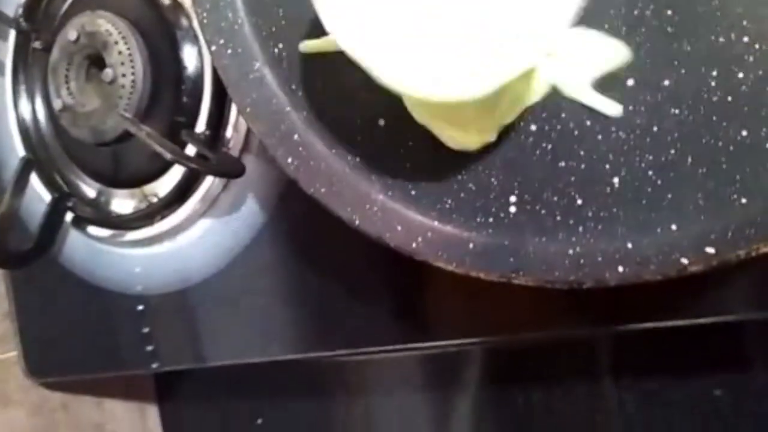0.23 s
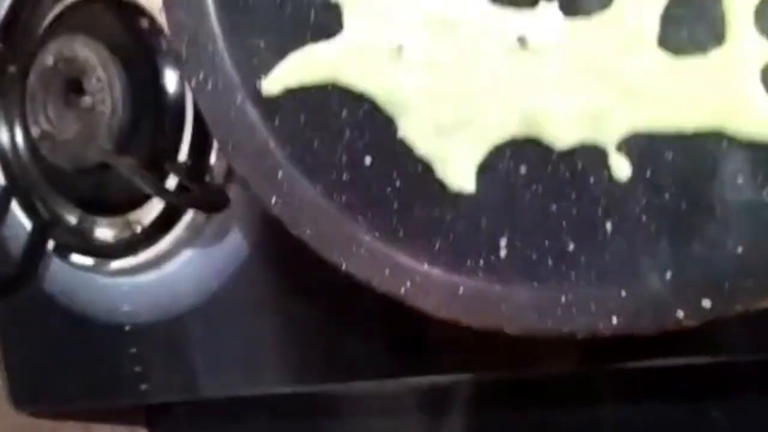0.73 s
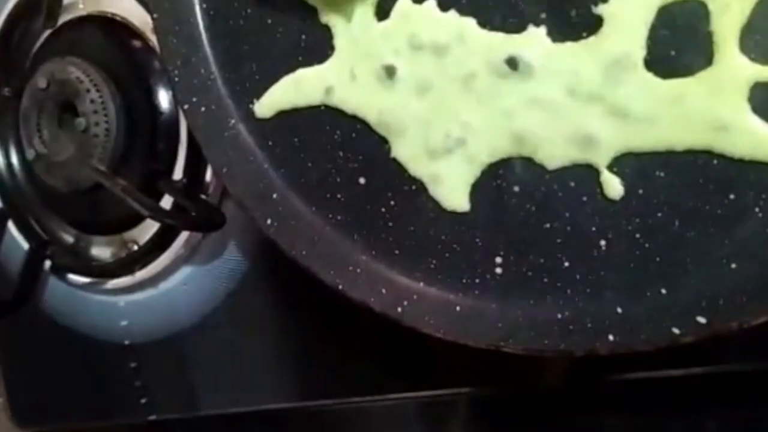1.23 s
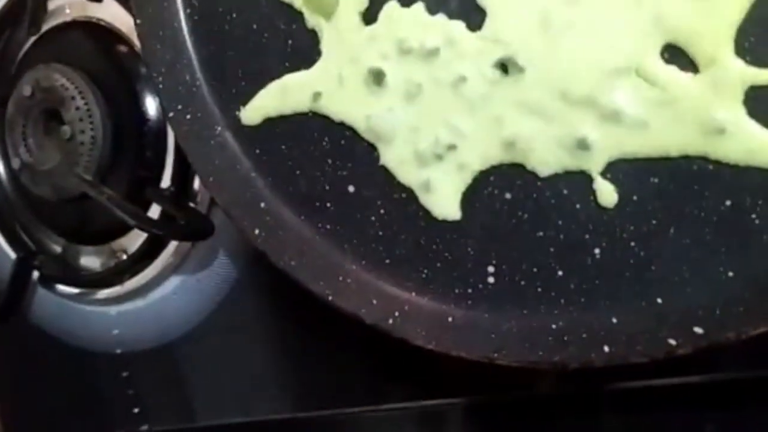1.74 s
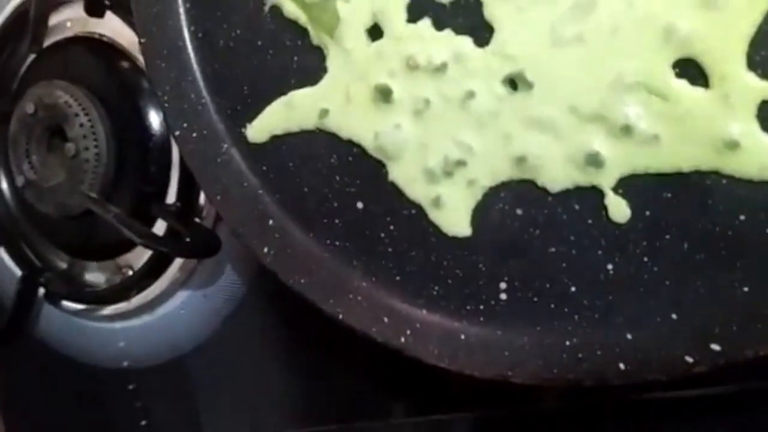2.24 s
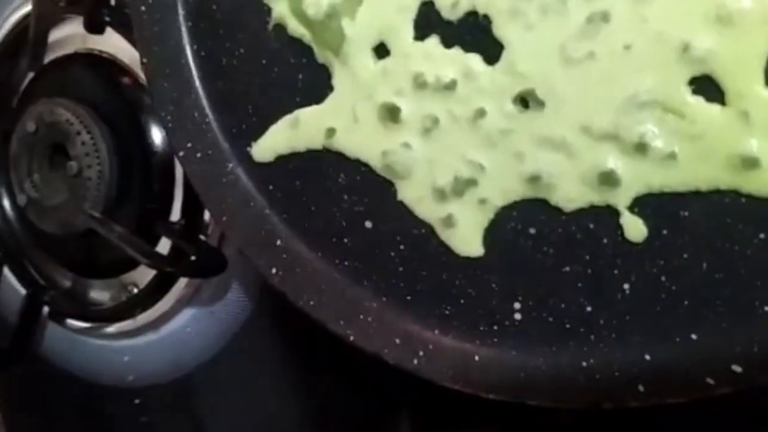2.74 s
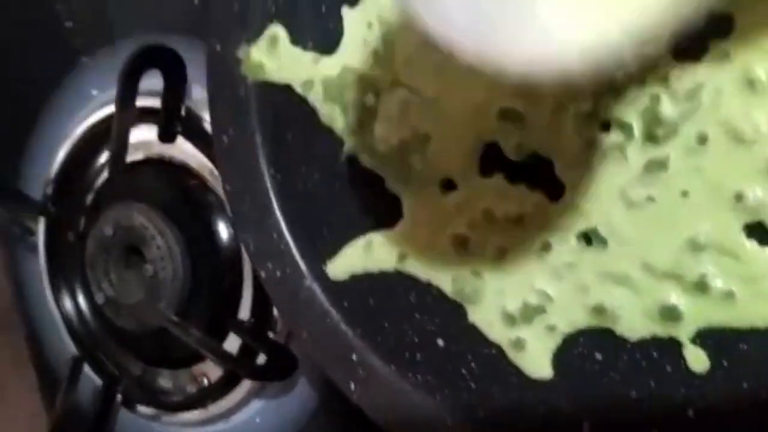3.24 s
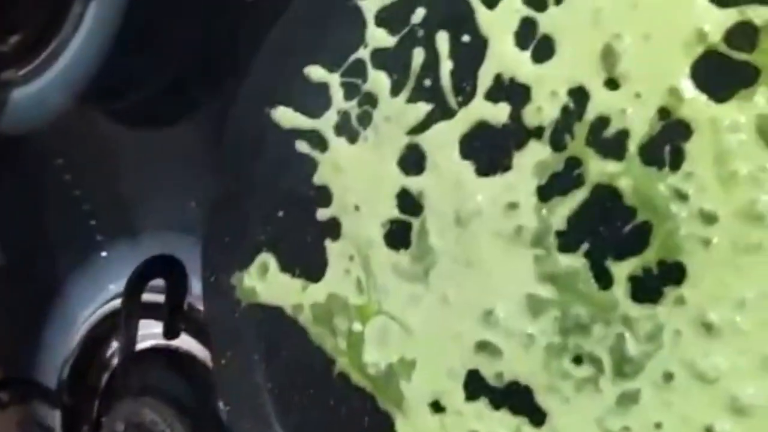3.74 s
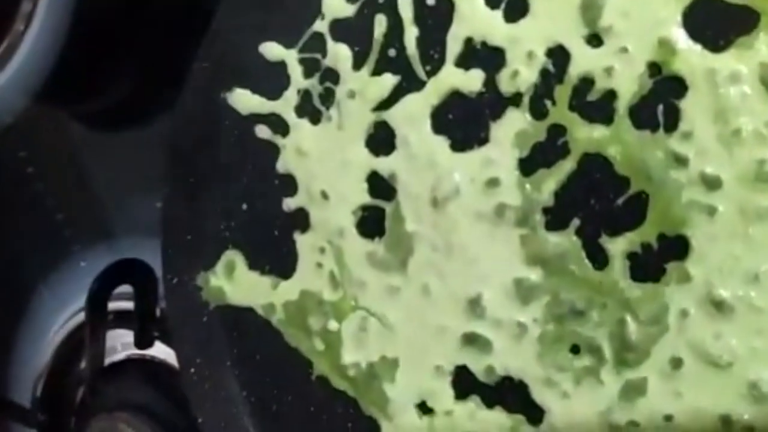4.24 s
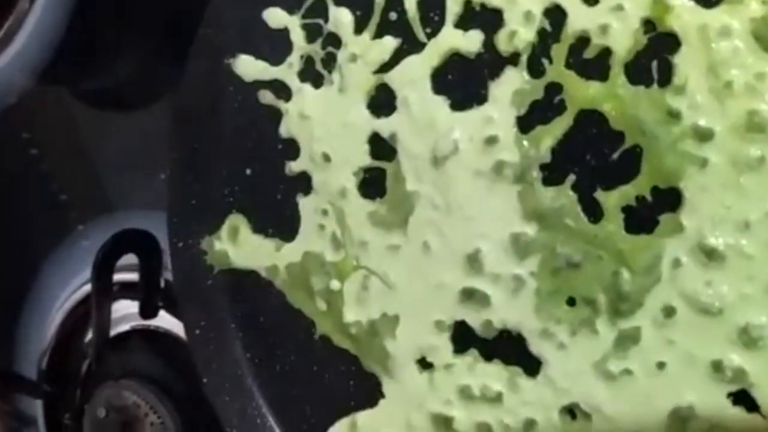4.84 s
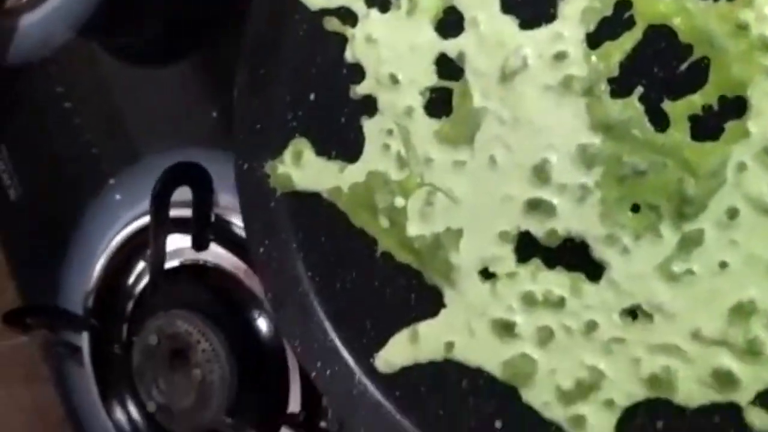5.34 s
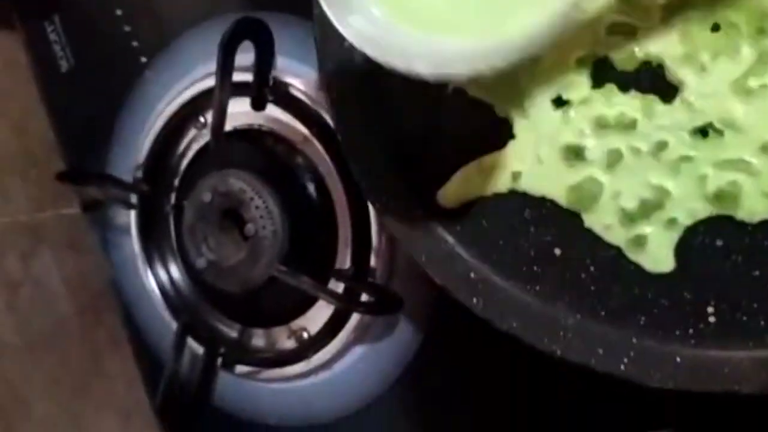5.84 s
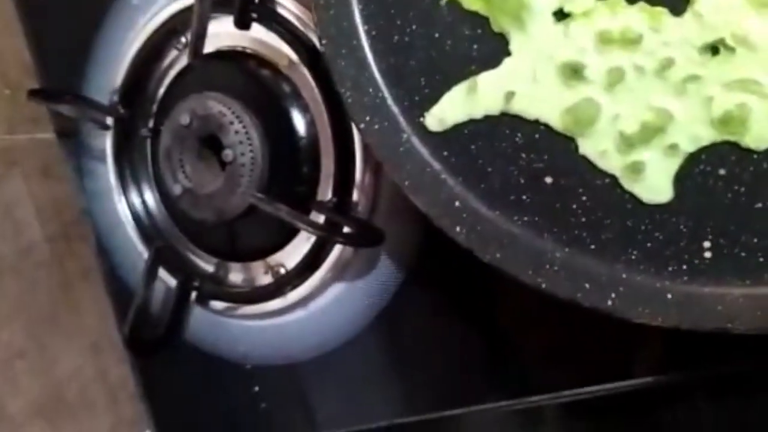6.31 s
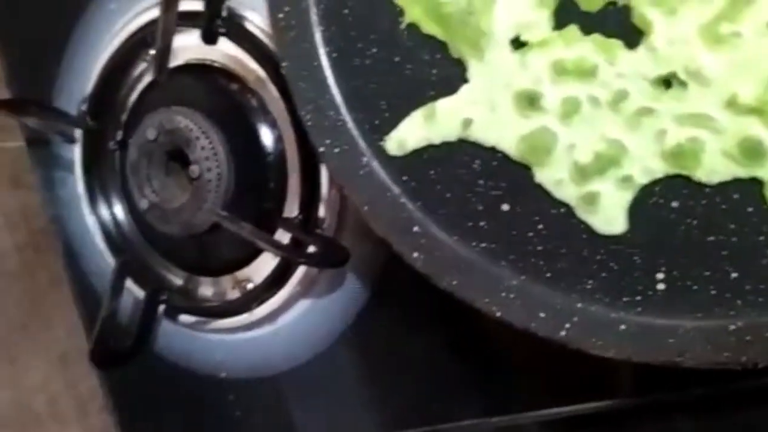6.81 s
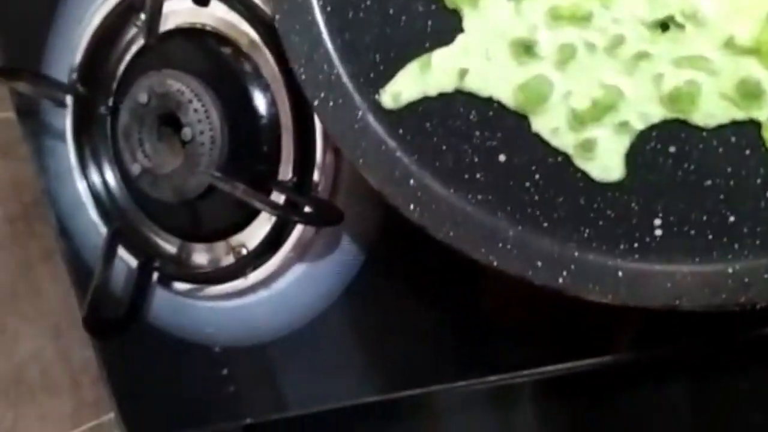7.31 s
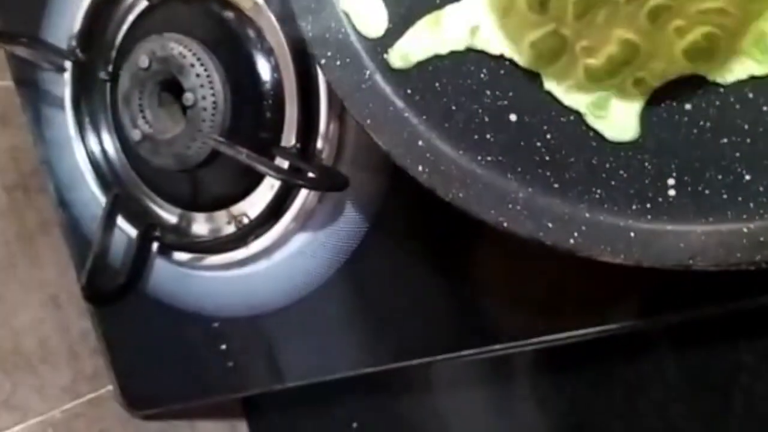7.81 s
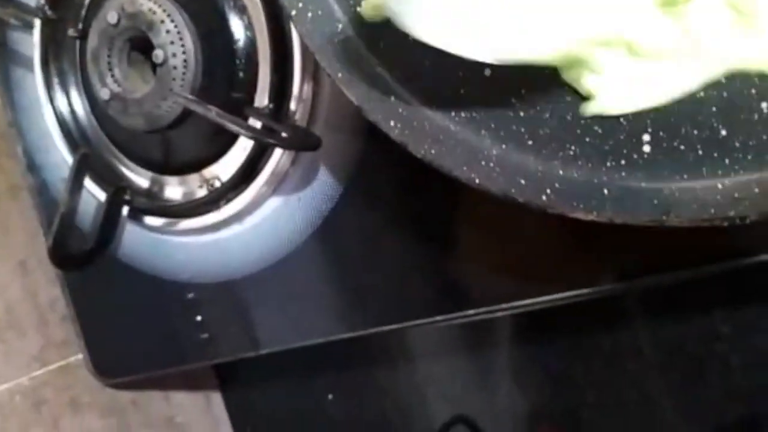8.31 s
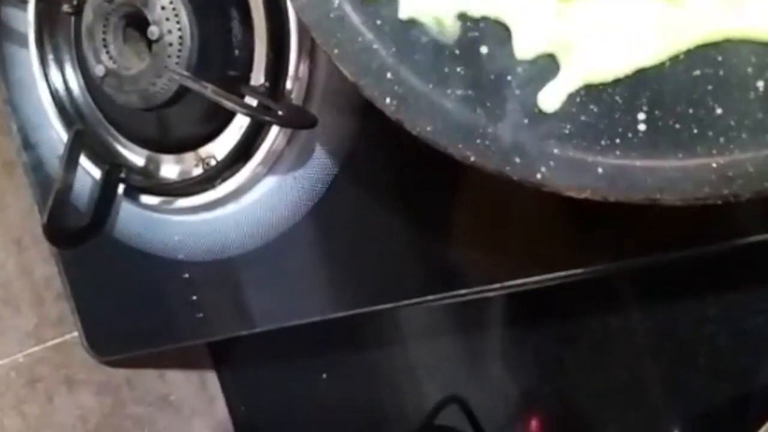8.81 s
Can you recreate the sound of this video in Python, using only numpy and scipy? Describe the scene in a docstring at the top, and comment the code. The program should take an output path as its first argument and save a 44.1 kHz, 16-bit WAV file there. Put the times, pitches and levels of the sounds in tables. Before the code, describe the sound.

Oily frying, recorded close and fairly dry by a moving handheld microphone. Batter hits hot metal in repeated sizzling gushes, strongest in the first third, then calms to a thin crackle. Padded knocks, a brief dull scuff and tiny high squeaks come midway, followed by a cluster of sharp spitting drops. Later gentler sizzles rise and fade over a low throbbing hum with a thin whine.

```python
"""In a small kitchen, thin batter is ladled onto a hot oiled pan, pour after pour.
Each pour surges as random steam-bubble snaps in six bands, finer ones mostly later, and settles to a crackle.
Filtered noise bursts make spitting drops, wavering sines the squeaks of trapped steam,
gated sines and noise the soft bumps and a scuff, and throbbing sines over low noise the stove."""
import sys
import numpy as np
from scipy import signal
from scipy.fft import rfft, irfft, next_fast_len
from scipy.io import wavfile

SR = 44100
rng = np.random.default_rng(int(sys.argv[2]) if len(sys.argv) > 2 else 0)


def wav_record(signal):
    """Record a signal, one row per channel, as 16-bit PCM in the file named by sys.argv[1]."""
    frames = np.transpose(np.atleast_2d(signal))
    bounded = np.clip(frames, -1, 1)
    # unit amplitude maps onto the largest positive 16-bit level
    quanta = np.round(bounded * 32767).astype(np.int16)
    wavfile.write(sys.argv[1], SR, quanta)


N = 399546
T = np.arange(N) / SR
PADDED = next_fast_len(N + SR // 10, True)
FREQS = np.maximum(np.arange(PADDED // 2 + 1) * SR / PADDED, 1)


def from_db(db):
    """Logarithmic level: 20 dB is a tenfold amplitude."""
    return 10 ** (np.asarray(db) / 20)


def rms_one(x):
    """Normalisation: scale to unit root mean square."""
    return x / np.sqrt(np.mean(x ** 2) + 1e-20)


def in_time(rows):
    """Linear interpolation: each column of a curve at every sample."""
    s, *columns = np.transpose(rows)
    return [np.interp(T, s, column) for column in columns]


def high_pass(x, order, hz):
    """High-pass filtering: remove what lies below a pitch."""
    return signal.sosfilt(signal.butter(order, hz, "high", fs=SR, output="sos"), x)


def colour(x, points):
    """Spectral shaping: levels in dB interpolated over log frequency in Hz."""
    hz, db = np.transpose(points)
    gain = from_db(np.interp(np.log(FREQS), np.log(hz), db))
    return irfft(rfft(x, PADDED) * gain, PADDED)[:N]


def resonator(hz, width_hz):
    """Damped resonance: coefficients of a pole pair with gain 1 near its top."""
    r, w = np.exp(-np.pi * width_hz / SR), 2 * np.pi * hz / SR
    return np.array([1, 0, -1]) * (1 - r * r) / 2, [1, -2 * r * np.cos(w), r * r]


def resonate(x, hz, width_hz):
    """Resonant filtering: a sound rings at one fixed pitch."""
    return signal.lfilter(*resonator(hz, width_hz), x + 1e-18)


def drift(per_s):
    """Slow random modulation: noise of rms 1, joined by straight lines between knots."""
    knots = rng.standard_normal(4000)
    return rms_one(np.interp(T * per_s, np.arange(len(knots)), knots))


def swell(start, length, edge):
    """Amplitude envelope: a rounded gate; edge is the share of its length spent rising or falling."""
    phase = (T - start) / length
    return np.sin(np.pi / 2 * np.clip(np.minimum(phase, 1 - phase) / edge, 0, 1))


def tone(hz, waver_hz, per_s=12):
    """Random frequency modulation: a wavering sine of rms 1."""
    return np.sqrt(2) * np.sin(2 * np.pi * np.cumsum(hz + waver_hz * drift(per_s)) / SR)


def add(out, s, sound):
    """Superposition: mix a short sound in at its time."""
    i = round(s * SR)
    out[i:i + len(sound)] += sound[:N - i]


def kitchen(x, wet_db, t60_s=0.17, wall_cut_hz=9000):
    """Reverberation: direct sound plus an exponentially decaying, duller tail from hob and walls."""
    t = T[:SR // 3]
    tail = rng.standard_normal(len(t)) * from_db(-60 * t / t60_s) * (t > .002)
    tail = signal.sosfilt(signal.butter(1, wall_cut_hz, fs=SR, output="sos"), tail)
    return x + from_db(wet_db) * signal.fftconvolve(x, tail / np.linalg.norm(tail))[:N]


# Stove hum. Each row: pitch in Hz, waver in Hz, level in dB before the swell, throb in dB.
HUM = [(98, 1.62, -66.5, 3.5), (145, 2.4, -59.5, 4.5)]
# Low noise colour. Each row: pitch in Hz, relative level in dB.
RUMBLE = [(20, -26), (40, -9.5), (62, -2.5), (82, -5.5), (105, 1), (150, 7), (175, -1), (215, -5),
          (255, -2), (380, -4), (550, -2), (800, -5), (1500, -7)]
# Stove as the microphone moves. Each row: time in seconds, swell of hum and rumble in dB, whine in dB.
STOVE_BALANCE = [(0, -1, -69), (2.5, -2.5, -64), (3.4, -3.5, -62), (4.1, -2.5, -58.5), (5.3, -2.5, -57.5),
                 (6.1, -3, -63.5), (6.6, -1, -57.5), (9.06, 0.5, -67)]


def stove(rumble_db=-49, whine_hz=491.5):
    """Amplitude modulation: throbbing hum over a low rumble, beside a thin whine of slowly shifting level."""
    swell_db, whine_db = in_time(STOVE_BALANCE)
    hum = 0
    for hz, waver_hz, db, throb_db in HUM:
        throb = throb_db * np.tanh(drift(9.6))
        hum = hum + from_db(db + throb) * tone(hz, waver_hz)
    rumble_colour = list(RUMBLE) + [(SR / 2, -70)]
    rumble = from_db(rumble_db) * rms_one(colour(rng.standard_normal(N), rumble_colour))
    whine = from_db(whine_db) * tone(whine_hz, waver_hz=0.63)
    return from_db(swell_db) * (hum + rumble) + whine


def scuff(start_s=4.99, length_s=0.13, level_db=-48.5, hz=476, width_hz=590):
    """Filtered friction noise: a brief dull rub of handling, noise through two equal resonances."""
    rub = resonate(resonate(rng.standard_normal(N), hz, width_hz), hz, width_hz)
    return from_db(level_db) * swell(start_s, length_s, edge=.4) * rms_one(rub)


# Soft bumps of handling. Each row: start in seconds, level in dB, mean pitch in Hz, length in seconds.
BUMPS = [(3.81, -46, 45, .048), (3.925, -53, 42, .05), (4.428, -43.5, 265, 0.024), (4.427, -49, 176, 0.028),
         (4.446, -46, 98, 0.17), (4.705, -50, 62, .06), (4.79, -51, 250, .035), (4.84, -49, 96.7, 0.15),
         (4.915, -45, 267, 0.038), (4.92, -48, 206, 0.031), (8.9, -55, 94.6, 0.042)]


def bumps(wobble=0.0405):
    """Short tone bursts: dull, padded knocks of low sines on one unsteady clock."""
    clock = np.cumsum(1 + wobble * drift(60)) / SR
    out = np.zeros(N)
    for s, db, hz, length in BUMPS:
        cycles = np.sqrt(2) * np.sin(2 * np.pi * hz * clock)
        out += from_db(db) * swell(s, length, edge=0.41) * cycles
    return out


# Thin squeaks. Each row: start in seconds, length in seconds, level in dB before the partials' own,
# extra level of the lower partials in dB.
SQUEAKS = [(4.353, .016, -38, 4), (4.378, .024, -39, 1), (4.403, .022, -45, 9), (4.427, .024, -41, -2),
           (4.46, 0.078, -44, 6), (5.489, .016, -36, -6), (5.783, .02, -43, 0), (6.26, .012, -41, -6),
           (6.283, .075, -51, -14)]
# Squeak partials, the highest last. Each row: pitch in Hz, waver in Hz, mean relative level in dB.
SQUEAK_PARTIALS = [(5560, 130, -23), (6660, 420, -10), (7700, 190, -12), (10700, 160, -12),
                   (12200, 170, -10), (12750, 380, -8), (13130, 170, -8), (14700, 110, -2)]


def squeaks(flicker_db=4.5):
    """Inharmonic partials: shaky whistles, as of steam forced out under batter; each comes and goes."""
    top, lower = np.zeros(N), np.zeros(N)
    for s, length, db, lower_db in SQUEAKS:
        gate = from_db(db) * swell(s, length, edge=0.11)
        top += gate
        lower += gate * from_db(lower_db)
    partials = []
    for hz, waver_hz, db in SQUEAK_PARTIALS:
        flicker = from_db(db + flicker_db * drift(70))
        partials.append(flicker * tone(hz, waver_hz, per_s=400))
    return kitchen(top * partials[-1] + lower * sum(partials[:-1]), wet_db=1)


def pops(per_s=110, usual_db=-29.5, spread_db=2.5, top_hz=11500):
    """Random point process: lesser drops at chance times, louder while the driest batter ticks."""
    level_db = usual_db + 2 * swell(4.64, 1.4, edge=0.16)   # dry from 4.64 s for 1.4 s, lifted by 2 dB
    rows = []
    for when, size, pitch in rng.random((int(per_s * N / SR), 3)):
        peak_db = level_db[int(when * N)] + spread_db * min(-np.log(size), 3)
        rows.append((when * T[-1], peak_db, 2500 * 4 ** pitch, top_hz, .0004))
    return rows


# Spitting drops. Each row: time in seconds, peak in dB before the bass cut, pitch in Hz,
# top of the snap in Hz, decay time of the spray in seconds.
SPITS = [(0.1911, -9, 8340, 12000, .0005), (2.4377, -4, 9800, 13000, .0003),
         (2.8619, -14, 8340, 12000, .0003), (2.8724, -16, 8600, 12000, .0003),
         (4.3443, -17, 6170, 11000, .0006), (4.5073, -19, 7200, 11000, .001),
         (4.7062, -17, 2600, 9000, 0.00059), (4.8633, -25, 5700, 10000, .0003),
         (5.1886, -26, 900, 3500, 0.002), (5.3164, -13.5, 9800, 14000, .0008),
         (5.3192, -24, 8500, 12000, .0006), (5.3518, -16.5, 9100, 13000, .0004),
         (5.4220, -14, 7000, 12000, .0012), (5.4255, -23, 4000, 9000, .002),
         (5.5440, -15, 8000, 13000, .0005), (5.5734, -18.5, 7700, 12000, .0012),
         (5.5802, -21, 5800, 10000, .0004), (5.6444, -19, 7700, 11000, .001),
         (5.8591, -17, 7640, 13000, 0.007), (5.9681, -20, 5800, 10000, .0004),
         (5.9772, -13, 7300, 12000, .0005), (5.9790, -25.5, 7500, 11000, 0.012),
         (6.0355, -19, 8400, 13000, 0.0058), (6.1149, -14, 10000, 14000, 0.0012),
         (6.1615, -15, 1600, 6500, .0005), (6.1652, -19.5, 1300, 5460, .0004),
         (6.2215, -21, 5900, 10000, .0005), (6.2747, -28, 6700, 10000, .0008),
         (6.3006, -22, 8260, 13000, .0006), (6.3108, -17, 6800, 11000, .0012),
         (6.3588, -15, 5200, 11000, .0003), (6.4682, -19, 2400, 8000, 0.00032),
         (6.6889, -17, 7800, 12000, 0.00036), (7.4375, -13, 3600, 9000, 0.0005),
         (7.9363, -3.5, 7360, 10000, 0.0003), (8.1419, -28, 5520, 12000, .0004),
         (8.2221, -25, 7620, 12000, .0003)]


def spits(spray_db=-6, full_spray_s=0.0035, tail_db=-20, tail_t60_s=.08, width_hz=3000, lowest_hz=750):
    """Impulse excitation: a drop's click, decaying noisy spray and short dry tail drive a broad resonance."""
    out, t = np.zeros(N), T[:SR // 20]
    for s, peak_db, hz, top_hz, length in list(SPITS) + pops():
        # a spray shorter than full_spray_s is also weaker
        strength = from_db(spray_db) * np.sqrt(min(length / full_spray_s, 1))
        spray = strength * np.exp(-(t / length) ** 2)
        tail = from_db(tail_db - 60 * t / tail_t60_s)
        push = (spray + tail) * rng.standard_normal(len(t))
        push[0] = 2   # the first click
        ringing = resonate(push, hz, min(width_hz + hz / 2, 2 * hz))
        snap = signal.lfilter(*signal.butter(2, top_hz, fs=SR), ringing)
        add(out, s, from_db(peak_db) * snap / abs(snap).max())
    return high_pass(out, 2, lowest_hz)


def bursts(per_s, size_db, largest, width_share, count=14):
    """Random impulses through damped resonances: bubbles snap at pitches of their own; flat on average."""
    chance = np.clip(per_s / SR, 0, 1)
    sizes = from_db(size_db * np.minimum(rng.exponential(1, N), largest)) * rng.choice([-1, 1], N)
    clicks = sizes * (rng.random(N) < chance) / np.sqrt(chance)   # mean power does not follow the rate
    dealt, snaps, power = rng.integers(0, count, N), 0, 0
    for k, hz in enumerate(np.geomspace(900, 14000, count)):
        snaps = snaps + resonate(clicks * (dealt == k), hz, width_share * hz)
        response = rfft(resonate(signal.unit_impulse(1024), hz, width_share * hz))[1:-1]
        power = power + abs(response) ** 2
    hz = np.linspace(0, SR / 2, len(power) + 2)[1:-1]
    return colour(snaps, np.c_[hz, -10 * np.log10(power)])   # undo the mean colour


def scatter(x, share=0.34, delays_s=(.0007, .0019, .0043)):
    """All-pass diffusion: pan wall, hob and backsplash smear each snap in time without colouring it."""
    spectrum = rfft(x, PADDED)
    for delay_s in delays_s:
        echo = np.exp(-2j * np.pi * FREQS * delay_s)
        spectrum = spectrum * (share - echo) / (1 - share * echo)
    return irfft(spectrum, PADDED)[:N]


# Resonances and hollows of pan and hob. Each row: pitch in Hz, width in Hz, then the lift in dB of this
# band alone over the pan, close above the batter and beside the pan.
PAN_BANDS = [(548, 80, 0.5, 3.0, 4.0), (619, 60, -2.5, -1.5, -5.0), (665, 40, 5.0, 2.5, 2.5),
             (789, 35, 0.0, 3.0, 1.5), (853, 170, -0.5, 0.5, -2.0), (1024, 115, 1.5, 2.0, 1.5),
             (1168, 95, 1.5, 1.0, -1.5), (1249, 90, 0.0, -1.0, 2.5), (1301, 75, -3.0, -2.0, 1.0),
             (1329, 45, -2.0, 1.0, -2.5), (1544, 100, 3.5, 0.0, 0.0), (1631, 100, -1.0, -1.0, 2.0),
             (1733, 100, -2.0, -1.5, -2.0), (1808, 40, 2.0, 1.0, 2.0), (2003, 75, -1.0, 1.0, -3.0),
             (2118, 420, 2.0, 3.5, 3.5), (2121, 110, 2.0, -0.5, -3.0), (2216, 135, -3.0, -1.5, 2.5),
             (2330, 135, 1.5, -2.0, -2.5), (2735, 60, 0.5, 2.0, 1.0), (3253, 125, -0.5, 0.0, 2.0),
             (3377, 205, 2.0, 1.0, 2.0), (3632, 295, 1.0, 1.0, -1.5), (3754, 95, -2.0, 0.5, 2.0),
             (3932, 70, 2.0, 1.0, 1.5), (4713, 380, 2.5, 3.0, 1.0), (4880, 250, -0.5, -1.0, 1.5),
             (5600, 385, 2.5, 3.5, 2.0), (5921, 585, -1.5, -2.0, -1.5), (6654, 585, 1.5, 2.0, 2.0),
             (6937, 130, 1.0, 1.0, 3.5), (7071, 135, -1.5, -2.0, -1.5), (7763, 455, 1.0, 1.5, 1.0),
             (10040, 1200, 1.0, 0.5, 0.5)]


def pan_body(x, column):
    """Modal filtering: pan and hob lift or swallow narrow bands, by the place of the microphone."""
    for hz, width_hz, *lifts_db in PAN_BANDS:
        x = x + (from_db(lifts_db[column]) - 1) * resonate(x, hz, width_hz)
    return x


# Colour of the frying over the middle of the pan. Each row: pitch in Hz, relative level in dB.
OVER_PAN = [(420.0, -18), (600.0, -11.5), (820.0, -17), (1020.0, -6), (1500.0, -6.5), (2200.0, -9),
            (3200.0, -6), (4600.0, -5.5), (6000.0, -6), (7300.0, -3.5), (8300.0, 1), (9400.0, -0.7),
            (11500.0, -11), (15600.0, -14.5)]
# Colour of the frying from beside the rim. Each row: pitch in Hz, relative level in dB.
BESIDE_PAN = [(420.0, -42), (600.0, -10.5), (870.0, -12.5), (1100.0, -9.5), (1550.0, -6.5), (2200.0, -11.5),
              (3200.0, -8), (4600.0, -5), (6000.0, -5.5), (7300.0, -4.5), (8200.0, 2), (9400.0, 0.5),
              (11500.0, -9), (15600.0, -11.5)]
# Where the microphone is. Each row: time in seconds, place (0 over the pan, 1 close above the batter,
# 2 beside the rim; fractions lie between).
PLACE = [(3.0, 0.32), (3.6, 0.24), (5.2, 1.15), (6.5, 1.5)]


def heard_from_place(fry):
    """Position-dependent radiation: crossfade between the colours of neighbouring places."""
    place, = in_time(PLACE)
    heard = np.zeros(N)
    for k, points in enumerate((OVER_PAN, OVER_PAN, BESIDE_PAN)):
        nearness = np.maximum(1 - abs(place - k), 0)
        heard += nearness * rms_one(colour(pan_body(fry, k), points))
    return heard


def glide(x, s, length, from_hz, to_hz, width_hz, size=256):
    """Time-varying resonance: its pitch slides over a short stretch, block by block; silent outside it."""
    out, state = np.zeros(N), np.zeros(2)
    for i in range(max(int(s * SR), 0), min(int((s + length) * SR), N), size):
        hz = np.interp(i / SR, [s, s + length], [from_hz, to_hz])
        block = slice(i, i + size)
        out[block], state = signal.lfilter(*resonator(hz, width_hz), x[block], zi=state)
    return out


# Gushes of fresh batter over the hot metal. Each row: start in seconds, length in seconds,
# first pitch in Hz, last pitch in Hz, width in Hz, greatest lift of this band alone in dB.
GUSHES = [(0.259, 0.4, 2407, 2250, 300, 5.5), (.27, 0.4, 1950, 1850, 160, 4),
          (0.35, 0.21, 1400, 1300, 580, 3.5), (0.24, 0.49, 490, 450, 200, 1.5),
          (1.45, 0.24, 4500, 2600, 2000, 5.5), (1.46, 0.22, 700, 490, 170, 4.5),
          (2.03, 0.19, 4200, 3900, 3000, 4.5), (2.09, 0.21, 710, 470, 150, 4.5),
          (1.92, 1.06, 1500, 1500, 360, 3), (6.69, 0.96, 1500, 1230, 400, 6),
          (6.86, 0.34, 2000, 1800, 460, 2.5), (6.1, 0.24, 2800, 2800, 80, 7.5),
          (7.43, 0.41, 7500, 7500, 3400, 2), (6.7, 0.37, 2100, 1700, 1200, 2.5),
          (7.46, .17, 6100, 4500, 1500, 2.5), (8.26, 0.37, 1900, 1300, 630, 3.5),
          (8.872, 0.33, 1250, 1400, 590, 4.5)]


def gush(fry):
    """Sliding formants: boiling batter runs over the metal and lifts a band that swells and fades."""
    for s, length, from_hz, to_hz, width_hz, lift_db in GUSHES:
        band = glide(fry, s, length, from_hz, to_hz, width_hz)
        fry = fry + (from_db(lift_db) - 1) * swell(s, length, edge=0.47) * band
    return fry


def surge(pour, size):
    """Attack, hold and exponential decay: strength of one bubble size in one pour; a lag slows the build-up."""
    s, rise_s, peak_db, hold_s, settle_db_per_s, lag_s, wet_db, spray_db = pour
    pour_db, _, lag_share, wet_share, spray_share, pace = size
    build_s = max(rise_s + lag_share * lag_s, 1 / SR)
    attack = np.sin(np.pi / 2 * np.clip((T - s) / build_s, 0, 1)) ** (1 + lag_share)
    top_db = peak_db + pour_db + wet_share * wet_db + spray_share * spray_db
    settled_db = pace * settle_db_per_s * np.maximum(T - s - build_s - hold_s, 0)
    return attack * from_db(top_db - settled_db)


# Ladles of batter; the sizes below scale and offset them. Each row: start in seconds, rise in seconds,
# peak in dB, hold in seconds, settling in dB/s, lag in seconds, wet splutter in dB, fine spray in dB.
POURS = [(-0.3, 0.22, -30.5, 0.035, 3.5, 0.035, -2.3, 2.5),
         (0.236, 0.095, -23.5, 0.14, 27, 0.036, 0.5, -2.5), (0.327, 0.32, -19, 0.2, 20.5, 0.015, 1.9, 0.1),
         (0.85, 0.12, -31, .04, 21, .02, -2, 5), (1.325, 0.11, -29, 0.043, 20, 0.0097, -4, 4),
         (1.383, 0.25, -14, 0.024, 34.5, 0.125, -0.9, 0), (2.039, 0.11, -18, 0.026, 27.5, 0.088, -1, 0),
         (2.518, 0.056, -27, 0.013, 14.5, 0.063, -3, 4.5), (2.934, .11, -25, 0.049, 29, 0.067, -3.5, 2),
         (6.426, 0.21, -35, 0.73, 1, 0.029, 5, 1), (6.643, 0.14, -26, 0.03, 49.5, 0, -3, 2),
         (7.442, 0.08, -24, 0.11, 13.5, 0, -1.5, -2.5), (8.19, 0.38, -26.5, 0.074, 9, 0.12, 0.5, 1)]
# Batter already on the pan crackles on. Each row: time in seconds, level in dB before the size offset.
CRACKLE = [(0, -32.5), (3.9, -34), (5.3, -34.5), (5.8, -36.5), (6.3, -37), (9.06, -36)]


def vigour(size):
    """Incoherent addition: all the pours add their power to the lasting crackle of one bubble size."""
    lasting_db, = in_time(CRACKLE)
    power = from_db(lasting_db + size[1]) ** 2
    return np.sqrt(power + sum(surge(pour, size) ** 2 for pour in POURS))


# Pitches parting the bubble sizes, from wet splutter to finest spray, in Hz.
SIZE_EDGES = (900, 1600, 2900, 7000, 11000)


def split_sizes(fry):
    """Complementary band splitting: one band per bubble size; all bands together restore the sound."""
    below = [0] + [1 / (1 + (FREQS / hz) ** 12) for hz in SIZE_EDGES] + [1]
    spectrum = rfft(fry, PADDED)
    return [irfft(spectrum * (high - low), PADDED)[:N] for low, high in zip(below, below[1:])]


# Bubble sizes, coarsest first. Each row: offset in a pour in dB, offset in the crackle in dB,
# share of the lag, share of the wet splutter, share of the fine spray, pace of settling (factors).
SIZES = [(-0.96, -3, 0.15, 0.94, 0.23, 0.73), (-2, 0.2, 0.4, 0.53, 0.66, 0.79),
         (0.6, 0.5, 0.083, 1.2, 0, 1.1), (1.63, -1.1, 0.015, 0.38, 0, 1.066),
         (-0.57, -3, 0.42, 0, 0.35, 1.12), (0.5, -2, 0.92, 0.27, 0.89, 1.25)]


def sizzle(bursts_per_s=7000, crowding=.75, wash_db=-2, flutter_db=0.28, patchy_db=0.56, lowest_hz=380):
    """Bubble acoustics: harder frying bursts more bubbles; six sizes wax and wane with each pour."""
    strengths = [vigour(size) for size in SIZES]
    fry_db = 20 * np.log10(sum(strengths))
    per_s = bursts_per_s * from_db(crowding * (fry_db - fry_db.mean()))
    crackle = rms_one(bursts(per_s, size_db=3.9, largest=4.8, width_share=.9))
    wash = from_db(wash_db) * rng.standard_normal(N)   # countless echoes blurred together
    fry = kitchen(scatter(crackle), wet_db=-10.5) + wash
    fry = high_pass(fry, 3, lowest_hz)   # no bubble is large enough for bass
    fry = gush(heard_from_place(fry))
    mix = np.zeros(N)
    for band, strength in zip(split_sizes(fry), strengths):
        mix += band * strength * from_db(patchy_db * drift(25))   # each size varies on its own
    return mix * from_db(flutter_db * drift(40))


def scene():
    """Linear superposition: all sources add, and both channels are alike."""
    mono = stove() + scuff() + bumps() + squeaks() + spits() + sizzle()
    return np.tile(mono, (2, 1))


def record(dry, cutoff_hz=15850):
    """Low-pass filtering: the top is cut steeply."""
    return signal.sosfilt(signal.ellip(12, .1, 90, cutoff_hz, fs=SR, output="sos"), dry)


dry = scene()
out = record(dry)
wav_record(out)
```